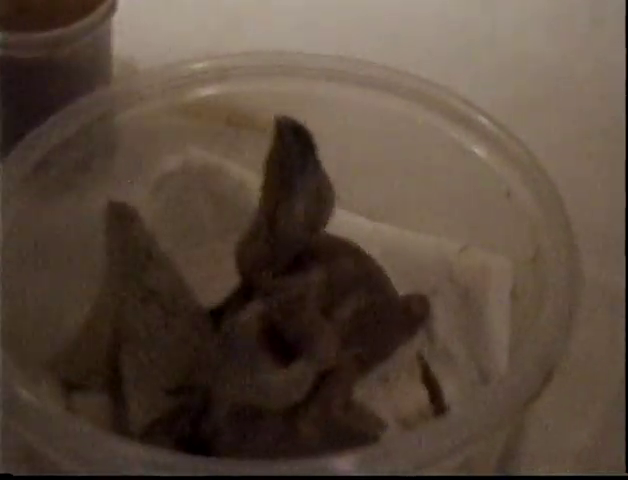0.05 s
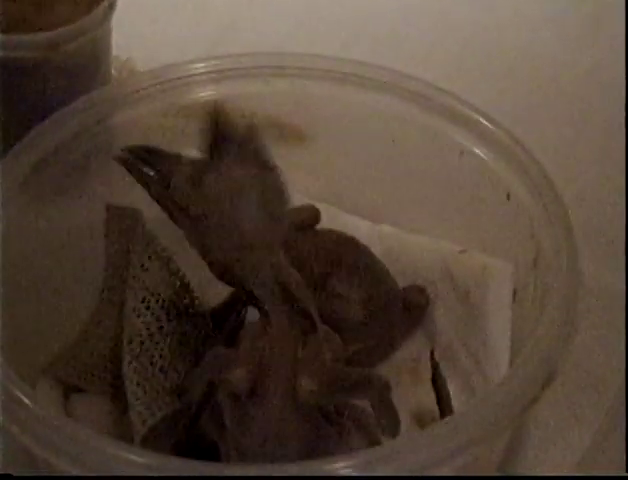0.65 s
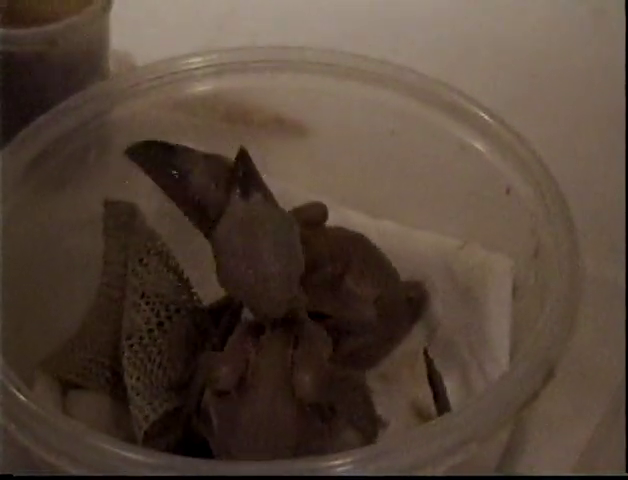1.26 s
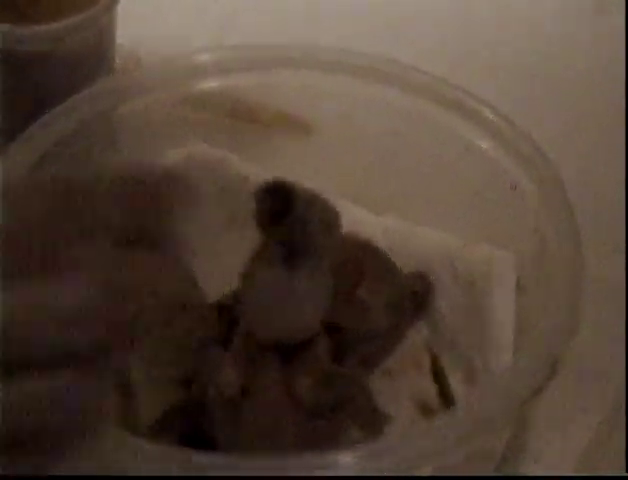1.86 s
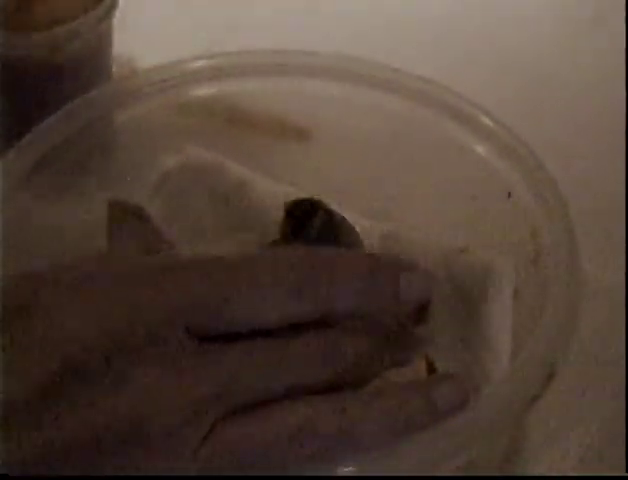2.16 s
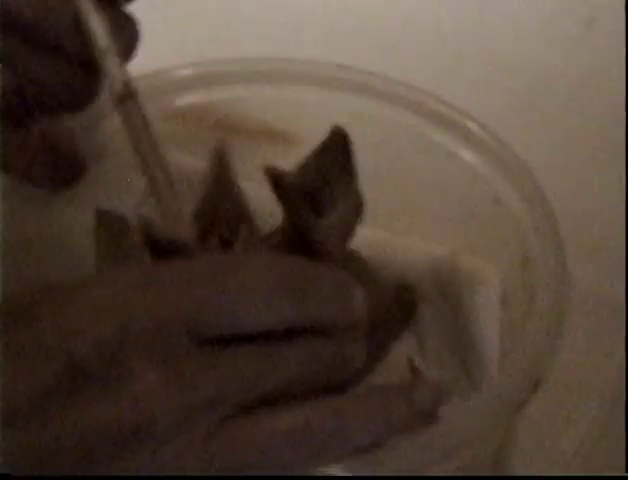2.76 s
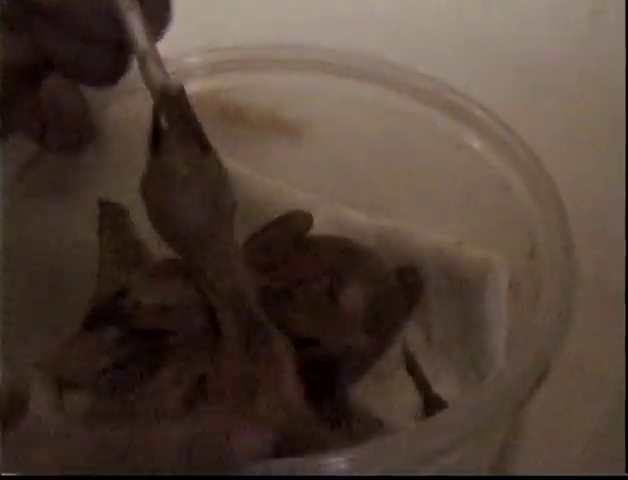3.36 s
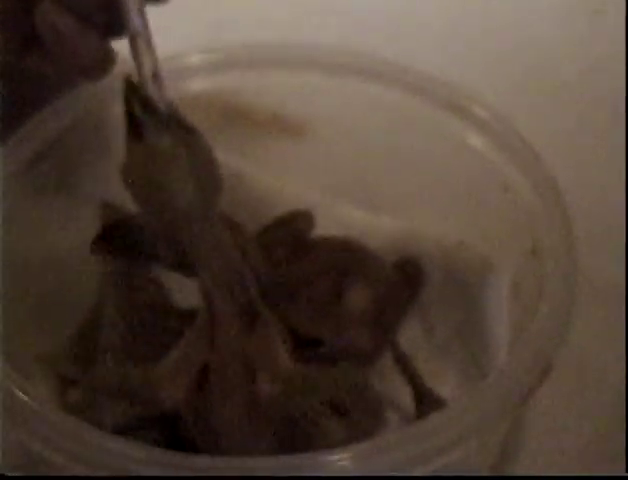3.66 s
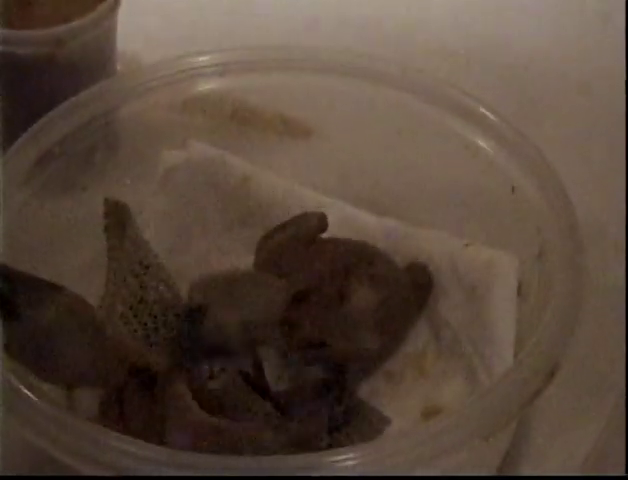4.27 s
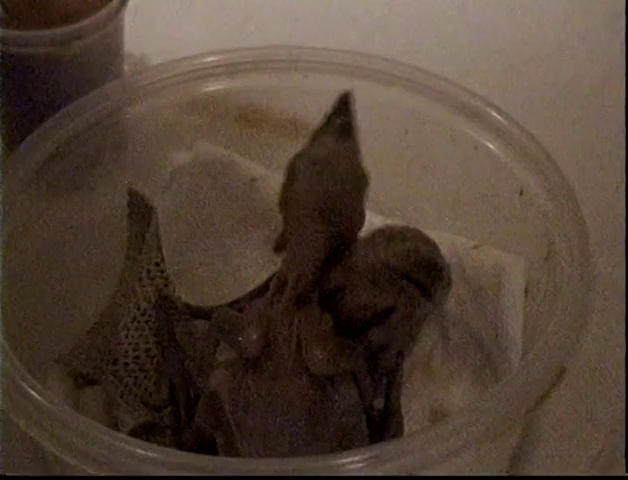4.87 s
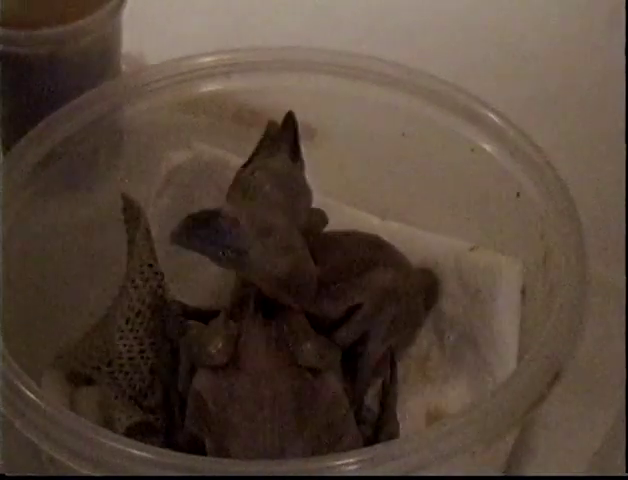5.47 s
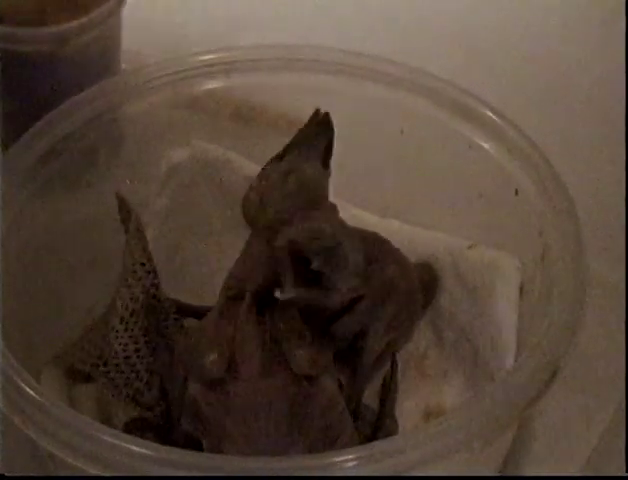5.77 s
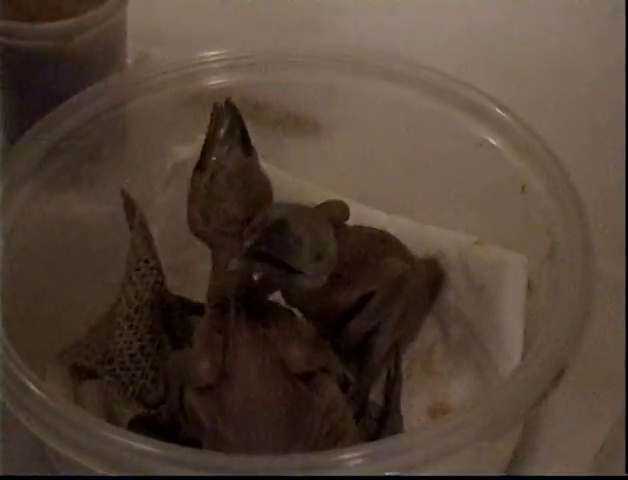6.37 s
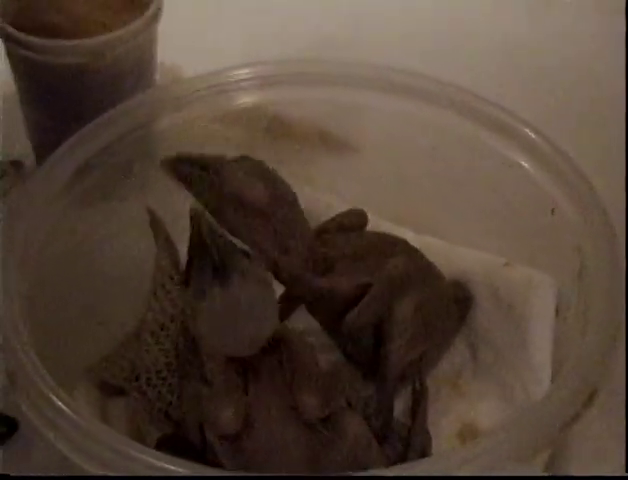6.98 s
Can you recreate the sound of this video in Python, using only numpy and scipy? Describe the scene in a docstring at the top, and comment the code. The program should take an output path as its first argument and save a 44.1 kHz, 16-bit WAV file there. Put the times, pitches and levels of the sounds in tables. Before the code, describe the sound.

Two chicks in a plastic tub beg with a quick run of harsh, hissing rasps. The calls ease a little, then turn into gulping squawks mixed with short shaky notes and hoarse high squeals as a chick is fed. After a brief lull the rasping returns. A few tiny taps on the plastic come through. The birds sound close in a small, slightly ringing room, with a faint fan humming throughout.

```python
"""In a plastic tub in a small room, two toucan chicks beg while they are fed.
Each rasp is a burst of fluttering air through throat and beak. At the food the calls turn into
gulping squawks, short notes and wavering squeals, and beaks and claws tap the plastic.
The tub throws the calls back, the room rings a little, and an appliance fan hums."""
import sys
import numpy as np
from scipy import signal
from scipy.fft import rfft, irfft, next_fast_len
from scipy.io import wavfile
from scipy.ndimage import map_coordinates

SR = 44100
rng = np.random.default_rng(int(sys.argv[2]) if len(sys.argv) > 2 else 0)


def waveform_to_disk(signal):
    """Save audio, clipped to [-1, 1], as 16-bit WAV at the path in sys.argv[1]."""
    frames = np.transpose(np.atleast_2d(signal))
    scaled = np.clip(frames, -1, 1) * 32767
    samples = np.round(scaled).astype(np.int16)
    wavfile.write(sys.argv[1], SR, samples)


N = 310149

# How the tub boosts or weakens each frequency of the rasps and squawks: f/Hz, gain/dB
TUB_COLOUR = [(300, -29), (750, -6.5), (1150, -13), (1550, -2), (2000, -1), (3000, 0.5), (3600, 2.2),
              (4300, 3.2), (5100, 0.3), (6200, -0.5), (7400, 3), (10200, 1.14), (11800, -6), (15000, -5.5)]


def amp(db):
    """Turn decibels into a gain."""
    return 10 ** (np.asarray(db) / 20)


def unit(x):
    """Scale x to an average (rms) level of 1."""
    return x / np.sqrt(np.mean(x ** 2) + 1e-20)


def along(points, hz):
    """Read between (frequency, value) points on a log frequency axis."""
    f, values = np.transpose(points)
    return np.interp(np.log(hz + 1), np.log(f + 1), values)


def wobble(rate, size):
    """A smooth curve through `rate` random points a second."""
    points = rng.standard_normal(int(size * rate / SR) + 4)
    return map_coordinates(points, [np.arange(size) * rate / SR])


def filtered(x, response):
    """Scale each frequency of x by response(hz)."""
    size = next_fast_len(N + SR // 2)
    return irfft(rfft(x, size) * response(np.fft.rfftfreq(size, 1 / SR)), size)[..., :N]


def pan(db):
    """Left and right gains, the left louder by db."""
    return amp([[db / 2], [-db / 2]])


def add(track, start, sound):
    """Mix a sound into a track at `start` seconds."""
    i = round(start * SR)
    sound = sound[..., max(-i, 0):max(N - i, 0)]
    track[..., max(i, 0):max(i, 0) + sound.shape[-1]] += sound


def fan(air_db=-47, drift_hz=9, faint_drift_rad=0.77, faint_gain_db=1):
    """A fan's motor hums and whines over a soft rush of air."""
    # Colour of the rushing air: f/Hz, relative level/dB
    air_colour = [(25, -21), (55, -9), (85, -20), (160, -15.5), (280, -7), (400, -14.5), (750, -10),
                  (1100, -13.5), (1600, -15), (2600, -26.5), (7500, -31), (10000, -36.5), (15000, -42.5)]
    # How alike the rush is left and right: f/Hz, likeness (1 = the same)
    likeness = [(60, 0.23), (300, 0.58), (1000, 0.022), (5000, 0.042)]
    # Mains hum and fan whine: f/Hz, level/dB, left over right/dB, left lead/rad, phase drift/rad
    motor_tones = [(57, -65.5, -1, .5, 1), (119.6, -53.5, .3, .95, .04), (254.7, -63.5, -2, 0.89, 2.47),
                   (464.3, -60.5, 11.5, 3.4, 0.52), (852, -53.5, 11.5, 1.2, 0.16)]
    # Faint fan tones: f/Hz, level/dB (before faint_gain_db)
    faint_tones = [(1427, -63), (1491, -73), (1642, -76), (1701, -67)]

    def air_response(hz):
        spread = np.arccos(along(likeness, hz)) / 2
        return amp(along(air_colour, hz)) * [np.cos(spread), np.sin(spread)]

    t = np.arange(N) / SR
    mid, side = filtered(rng.standard_normal((2, N)), air_response)
    out = amp(air_db) * unit(np.array([mid + side, mid - side]))
    for hz, db, side_db, lead, drift in motor_tones:
        phase = 2 * np.pi * hz * t + drift * wobble(drift_hz, N)
        out += amp(db) * pan(side_db) * unit(np.sin(phase + np.array([[lead / 2], [-lead / 2]])))
    for hz, db in faint_tones:
        phase = 2 * np.pi * hz * t + faint_drift_rad * wobble(drift_hz, N)
        out += amp(db + faint_gain_db) * unit(np.sin(phase))
    return out


def echoes(x, fade_times, delay_s):
    """A blur of reflections, different left and right; each frequency fades at its own speed."""
    hz, t, noise = signal.stft(rng.standard_normal((2, SR // 2)), SR, nperseg=256)
    tail = signal.istft(noise * amp(-60 * t / along(fade_times, hz)[:, None]), SR, nperseg=256)[1]
    tail /= np.linalg.norm(tail, axis=1, keepdims=True)
    tail = np.pad(tail, ((0, 0), (int(delay_s * SR), 0)))
    return signal.fftconvolve(x, tail, axes=1)[:, :N]


def tub_bounces(call, bounce_db=-12):
    """The head moves between calls, so the first bounces off the tub differ each time and per side."""
    paths = rng.standard_normal((2, SR // 500))
    paths *= amp(bounce_db) / np.linalg.norm(paths, axis=1, keepdims=True)
    paths[:, 0] = 1  # the straight path
    paths /= np.linalg.norm(paths, axis=1, keepdims=True)
    return signal.fftconvolve(call[None], paths, axes=1)


def taps(ring_cycles=14, scratch_level=0.2, scratch_s=0.0044):
    """Beaks and claws tap the plastic: a tiny scratch and a ring that dies quickly."""
    # Taps on the tub: t/s, level/dB, f/Hz
    hits = [(.1544, -35, 8000), (4.2794, -47, 7940), (6.1188, -38, 328), (6.136, -35.5, 573)]
    out, t = np.zeros(N), np.arange(SR // 10) / SR
    for start, db, hz in hits:
        ring = np.sin(2 * np.pi * hz * t) * amp(-60 * t * hz / ring_cycles)
        scratch = scratch_level * rng.standard_normal(len(t)) * amp(-60 * t / scratch_s)
        add(out, start, amp(db) * (ring + scratch))
    return out


def notes(top_at=0.363, droop=0.339, full_droop_s=0.106, jitter=0.016, harmonics_db=(0, -1, 0)):
    """The voice sounds three shaky harmonics whose pitch arches and sags at the end."""
    # Voiced notes inside the calls: t/s, length/s, top f/Hz, level/dB
    voiced = [(.522, 0.039, 2200, -31.5), (2.905, 0.12, 1520, -39.5), (3.035, 0.12, 1450, -42),
              (3.548, 0.036, 2110, -30.5), (3.91, .04, 2120, -38), (4.154, .04, 2060, -51),
              (4.565, 0.092, 1400, -46), (4.666, 0.094, 1270, -48.5), (4.915, 0.068, 1510, -48)]
    out = np.zeros(N)
    shake = 1 + jitter * wobble(500, N)
    roughness = unit(amp(3 * wobble(400, N)))
    for start, length, top_hz, db in voiced:
        progress = np.linspace(0, 1, int(length * SR))
        arch = 1 - droop * min(length / full_droop_s, 1) ** 2 * (progress - top_at) ** 2
        pitch = top_hz * arch * shake[round(start * SR):][:len(progress)]
        phase = 2 * np.pi * np.cumsum(pitch) / SR
        tone = sum(amp(level) * np.sin(k * phase) for k, level in enumerate(harmonics_db, 1))
        add(out, start, amp(db) * np.sin(np.pi * progress) * tone)
    return out * roughness


def squeals(gain_db=1, jitter_hz=200, shake_rate=700, rough_rate=450, rough_db=4):
    """The syrinx, a bird's voice box, sounds short, hoarse, gliding whistles; the first one lies on the third
    harmonic of a voiced note."""
    # Squeals: t/s, length/s, first f/Hz, last f/Hz, level/dB (before gain_db)
    whistles = [(2.925, 0.034, 4420, 4620, -21.5), (2.959, 0.044, 4800, 5090, -25),
                (3.577, 0.043, 5200, 4700, -24.5), (3.67, 0.029, 6300, 7500, -26),
                (3.775, 0.041, 5250, 6570, -28.5), (3.881, 0.052, 6150, 5250, -24),
                (3.925, 0.0286, 4250, 3600, -29.5), (4.483, 0.043, 2500, 3350, -38),
                (4.519, 0.051, 4950, 5550, -29), (4.616, 0.0253, 5250, 6000, -31)]
    out = np.zeros(N)
    shake = jitter_hz * wobble(shake_rate, N)
    roughness = unit(amp(rough_db * wobble(rough_rate, N)))
    for start, length, from_hz, to_hz, db in whistles:
        progress = np.linspace(0, 1, int(length * SR))
        pitch = from_hz + (to_hz - from_hz) * progress + shake[round(start * SR):][:len(progress)]
        swell = np.sqrt(2 * np.abs(np.sin(np.pi * progress)))
        add(out, start, amp(db + gain_db) * swell * np.sin(2 * np.pi * np.cumsum(pitch) / SR))
    return out * roughness


def airflow(flutter_hz, flutter_db, shake_hz, shake_db):
    """Rushing air, chopped unevenly by the voice box."""
    noise = rng.standard_normal(N)
    return noise * unit(amp(flutter_db * wobble(flutter_hz, N) + shake_db * wobble(shake_hz, N)))


def breath(air, length):
    """A random stretch of airflow in short slices: frequencies, slice times, spectrum."""
    size = max(int(length * SR), 256)
    first = int(rng.random() * (N - size))
    hz, t, spectrum = signal.stft(air[first:first + size], SR, nperseg=256)
    return hz[:, None] + 1, t, spectrum


def resonance(hz, centre, q):
    """The power a hollow space passes around its centre frequency; a higher q is narrower."""
    return 1 / (1 + (q * (hz / centre - centre / hz)) ** 2) ** 3


def quiver(t, depth):
    """The beak never holds still: a factor near 1 that shakes a resonance."""
    sample_times = np.arange(int(t[-1] * SR) + 1) / SR
    return np.interp(t, sample_times, 1 + depth * wobble(91.3, len(sample_times)))


def through_bird(spectrum, power):
    """Shape a breath by the power that throat and beak pass, and turn it back into sound."""
    return signal.istft(spectrum * np.sqrt(power), SR, nperseg=256)[1]


def squawks(beak_gain_db=-1, throat_growth=0.52, waver=0.033):
    """As a chick gulps, the high resonances swing with the beak; throat and gullet stay put."""
    # One list of points for each squawk: t/s, relative level/dB, beak resonance f/Hz
    gulps = [
        [(2.852, -24.0, 4900.0), (2.913, -15, 4280.0), (2.946, -14.5, 4470.0), (2.985, -17.0, 4330),
         (3.035, -21.0, 3620), (3.08, -12, 4230), (3.184, -25.5, 3320), (3.211, -17, 3630),
         (3.306, -20.5, 3750), (3.369, -44, 3900.0)],
        [(3.445, -44, 6240.0), (3.472, -24, 6220.0), (3.508, -15.5, 4600), (3.585, -15.5, 5200),
         (3.653, -18, 4430), (3.696, -20, 6400), (3.723, -26, 3430), (3.76, -17, 5600), (3.798, -21.5, 5770),
         (3.832, -29, 5250.0), (3.865, -24, 3570.0), (3.9, -17, 5630), (3.951, -20, 3750.0),
         (3.983, -32, 4540.0), (4.026, -31, 7490.0), (4.062, -19.5, 5100), (4.128, -43.5, 3590.0)],
        [(4.484, -39.5, 2260.0), (4.496, -23.5, 4700), (4.543, -13.5, 6200), (4.581, -16.5, 5300),
         (4.622, -18.5, 5370), (4.662, -40, 6040), (4.73, -32.5, 4490.0), (4.766, -52, 3770.0)],
        [(4.787, -48, 4740.0), (4.832, -33, 4160.0), (4.887, -24.5, 3270), (4.93, -17.0, 6200),
         (4.973, -12, 5660), (5.019, -36, 5740.0)],
    ]
    out = np.zeros((2, N))
    air = airflow(flutter_hz=400.4, flutter_db=1, shake_hz=91, shake_db=1)
    for points in gulps:
        times, levels, centres = np.transpose(points)
        start = times[0]
        hz, t, spectrum = breath(air, times[-1] - start)
        db = np.interp(start + t, times, levels)
        beak_hz = np.exp(np.interp(start + t, times, np.log(centres))) * quiver(t, waver)
        beak = resonance(hz, beak_hz, q=2.08)
        upper = amp(-10) ** 2 * resonance(hz, 1.354 * beak_hz, q=2.6)
        overtone = amp(-21) ** 2 * resonance(hz, 2.25 * beak_hz, q=5.1)
        hiss = amp(-23) ** 2 / (1 + (hz / (1.4 * beak_hz)) ** 10) + amp(-33) ** 2
        # throat and open gullet swell less than the beak
        throat = amp(-20 + throat_growth * db) ** 2 * resonance(hz, 2300, q=0.4)
        gullet = amp(-15 + throat_growth * db) ** 2 * resonance(hz, 1230, q=2.6)
        power = amp(db + beak_gain_db) ** 2 * (beak + upper + overtone + hiss) + throat + gullet
        add(out, start, tub_bounces(through_bird(spectrum, power)))
    return filtered(out, lambda hz: amp(along(TUB_COLOUR, hz)))


def rasps(gain_db=-0.5, throat_hz=1900, upper_hz=6030, edge_hz=10000, fade_power=1.82, waver=0.018):
    """Air swells and fades through a steady throat and a moving beak, hissing most at full effort."""
    # Begging rasps: t/s, rise/s, fall/s, relative level/dB, beak first f/Hz, beak last f/Hz, beak q,
    # then, compared with the beak: throat/dB, upper resonance/dB, hiss/dB
    calls = [(-.07, 0.029, 0.16, -13, 4420, 4600, 2.4, -10.5, -3, -17),
             (.233, .04, .22, -14, 5000, 5350, 1.52, -8, -18, -20),
             (.31, .11, 0.2, -12.5, 4200, 4200, 3, -10.5, -13.5, -28),
             (.51, 0.032, 0.14, -13, 4600, 4400, 2.2, -9, -5, -20.5),
             (0.651, .048, 0.18, -12.5, 4400, 5050, 2.9, -13, -8, -17),
             (.836, 0.042, 0.17, -10.5, 5150, 5340, 2.6, -11.5, -8, -17.5),
             (1.056, 0.023, 0.18, -11, 4020, 4570, 3.1, -8.5, -8.5, -17),
             (1.382, 0.042, 0.21, -26, 3660, 3570, 1.8, 3.5, -39, -12.5),
             (1.5, 0.15, .22, -34.5, 2190, 2220, 3.5, 7.5, -9, -17),
             (1.68, 0.037, 0.14, -18.5, 3840, 4300, 2.6, -6.5, -2.5, -13.5),
             (1.836, 0.047, 0.21, -24.5, 4000, 3560, 1.8, -1.5, -0.5, -11.5),
             (1.98, .12, .17, -26, 3200, 3900, 2.7, .5, -9, -12),
             (2.257, 0.074, .13, -22.5, 3400, 4600, 1.3, -1, -2.5, -8.5),
             (2.571, 0.026, 0.36, -15.5, 5130, 4160, 2.4, -19, -2, -9),
             (2.735, .08, 0.11, -12, 4950, 4700, 2.4, -14, -6, -12.5),
             (4.135, .037, 0.063, -38.5, 3300, 3600, 3.5, 7.5, -4, -16),
             (4.342, 0.046, .22, -46, 5240, 5600, 1.5, -11, -8, -16),
             (5.062, 0.32, 0.32, -47, 5560, 6050, 1.8, -12, -10, -25),
             (5.533, .045, .32, -19, 4390, 3720, 3.2, -14.5, -4.5, -19.5),
             (5.766, .008, 0.2, -17.5, 5800, 4670, 2.4, -9.5, -5, -22),
             (5.815, 0.087, 0.12, -19, 4220, 5240, 2, -8.5, -2.5, -6),
             (6.195, 0.042, .21, -28, 4320, 3280, 0.93, -1.5, 5, -8.5),
             (6.37, .16, .065, -25, 4400, 4400, 1, -1, -2, -9),
             (6.56, 0.055, 0.13, -13.5, 5000, 4720, 4.2, -13, -4, -15),
             (6.698, 0.049, 0.29, -16, 4800, 3650, 3.7, -9.5, -0.5, -16.5),
             (6.836, 0.029, .14, -9.5, 6140, 6060, 3.5, -15, -18, -25),
             (6.975, 0.057, 0.064, -15, 3920, 4800, 2.4, -8.5, 4, -7.5)]
    out = np.zeros((2, N))
    air = airflow(flutter_hz=420, flutter_db=0.7, shake_hz=70, shake_db=0.24)
    for start, rise, fall, db, from_hz, to_hz, q, throat_db, upper_db, hiss_db in calls:
        length = rise + fall
        hz, t, spectrum = breath(air, length)
        ramp = np.interp(t, [0, rise, length], [0, 1, 0])
        effort = np.sin(np.pi / 2 * ramp) ** np.where(t < rise, 1, fade_power)
        beak_hz = np.interp(t, [0, length], [from_hz, to_hz]) * quiver(t, waver)
        treble_cut = 1 / (1 + (hz / edge_hz) ** 10)
        beak = resonance(hz, beak_hz, q)
        overtone = amp(-21) ** 2 * resonance(hz, 2.53 * beak_hz, q=3) * treble_cut
        hiss = amp(hiss_db) ** 2 * effort * (treble_cut + amp(-17) ** 2)
        throat = amp(throat_db) ** 2 * resonance(hz, throat_hz, q=1.05)
        upper = amp(upper_db) ** 2 * resonance(hz, upper_hz * quiver(t, waver), q=2.52)
        # throat and beak partly cancel each other just below the beak resonance
        dip = 1 - 0.36 * resonance(hz, 0.76 * beak_hz, q=4.5)
        power = effort ** 2 * (beak + overtone + hiss + throat + upper) * dip
        add(out, start, tub_bounces(amp(db + gain_db) * through_bird(spectrum, power)))
    return filtered(out, lambda hz: amp(along(TUB_COLOUR, hz)))


def scene(near_db=-0.5, room_db=-19):
    """The chicks in their tub, the room around them and the fan; the treble scatters most."""
    # Sound that arrives by way of the walls: f/Hz, share of the power
    scattered = [(2000, 0.23), (4000, 0.3), (8000, 0.48), (13000, 0.76)]
    # Echo of the tub and nearby walls: f/Hz, time to fade by 60 dB/s
    wall_fade = [(1000, 0.073), (12000, 0.047)]
    # Echo of the room: f/Hz, time to fade by 60 dB/s
    room_fade = [(1000, 0.78), (5000, 0.69), (8000, 0.69), (13000, 0.072)]
    chicks = pan(0.72) * (rasps() + squawks() + notes() + squeals() + taps())
    direct = filtered(chicks, lambda hz: np.sqrt(1 - along(scattered, hz)))
    walls = echoes(chicks, wall_fade, delay_s=0.0007)
    walls = filtered(walls, lambda hz: np.sqrt(along(scattered, hz)))
    room = echoes(chicks, room_fade, delay_s=0.008)
    return amp(near_db) * (direct + walls) + amp(room_db) * room + fan()


def record(dry, top_hz=15750):
    """Cut away the very highest treble."""
    return filtered(dry, lambda hz: hz < top_hz)


dry = scene()
out = record(dry)
waveform_to_disk(out)
```